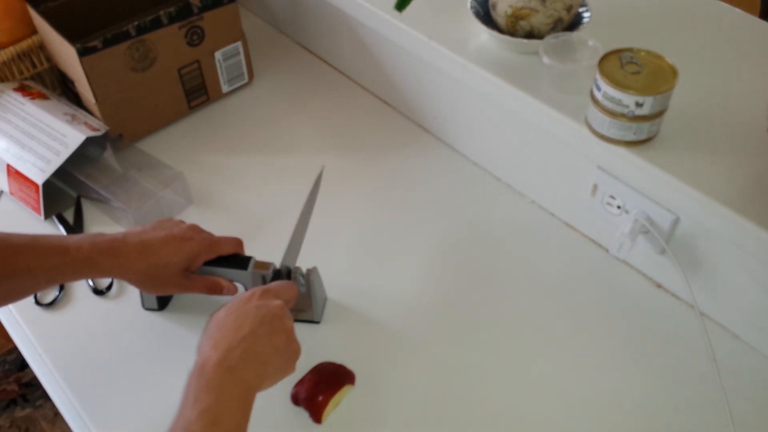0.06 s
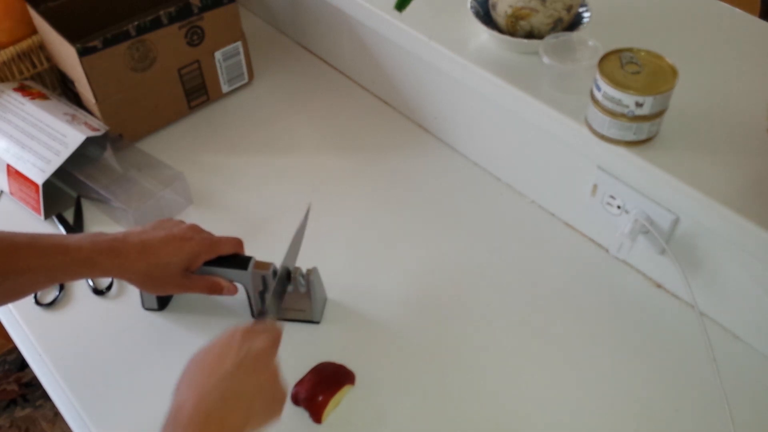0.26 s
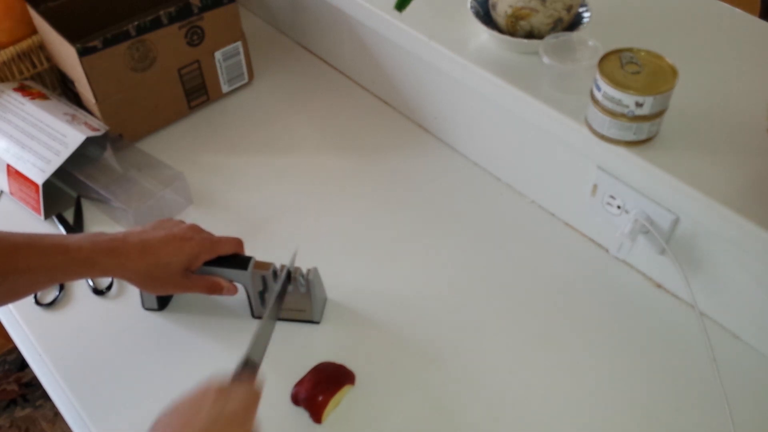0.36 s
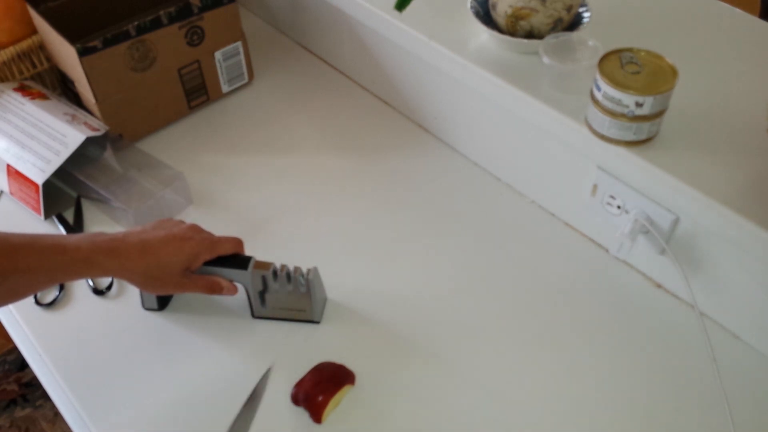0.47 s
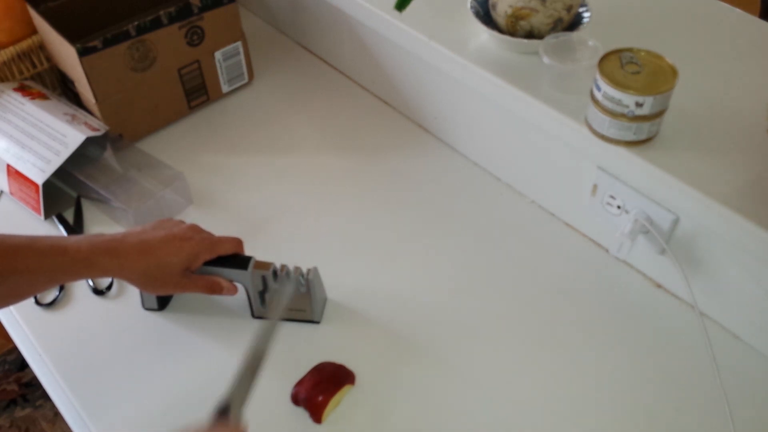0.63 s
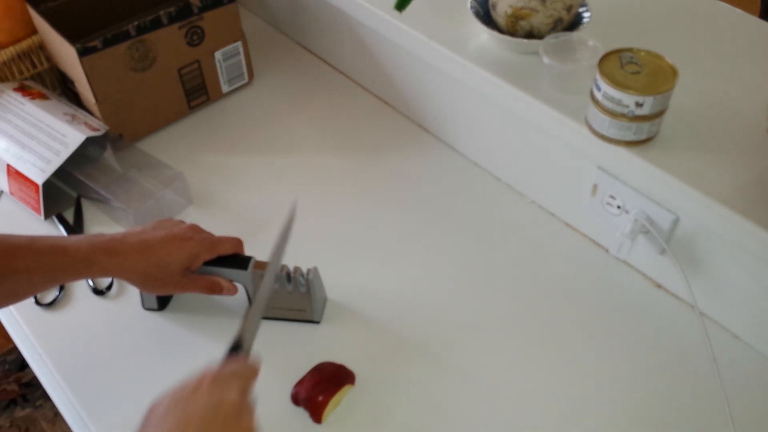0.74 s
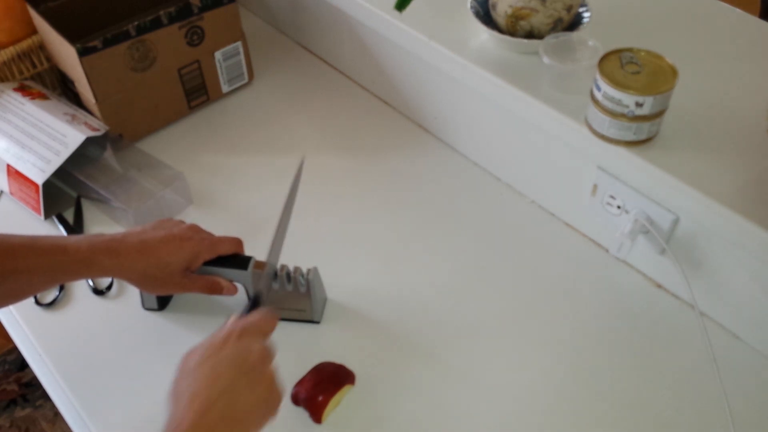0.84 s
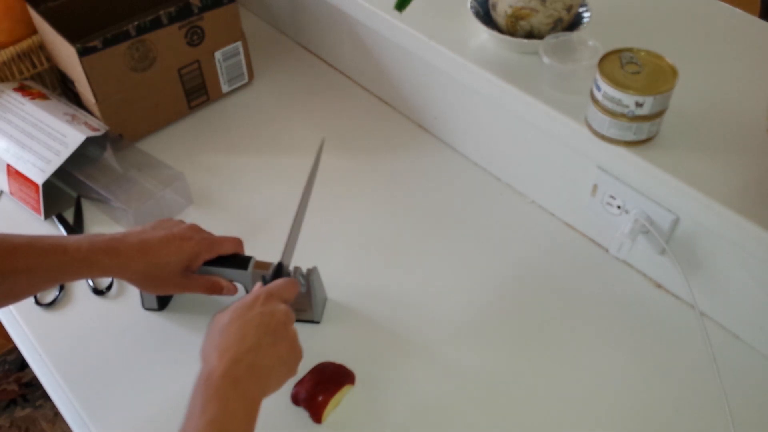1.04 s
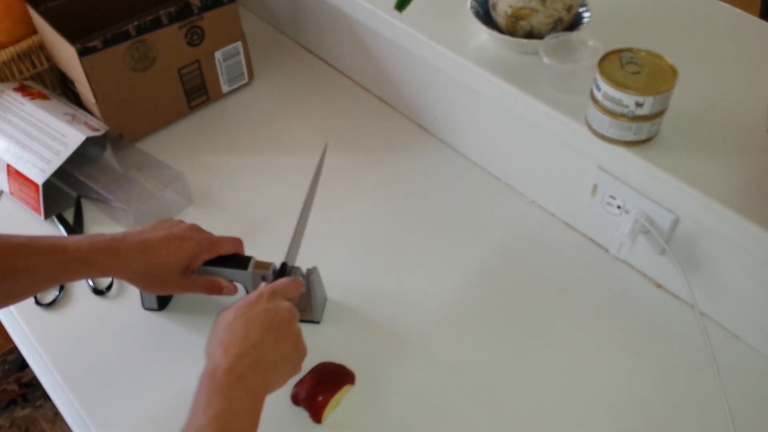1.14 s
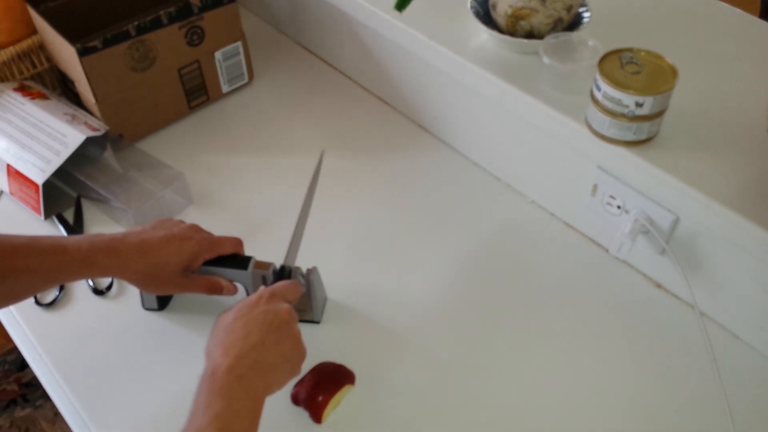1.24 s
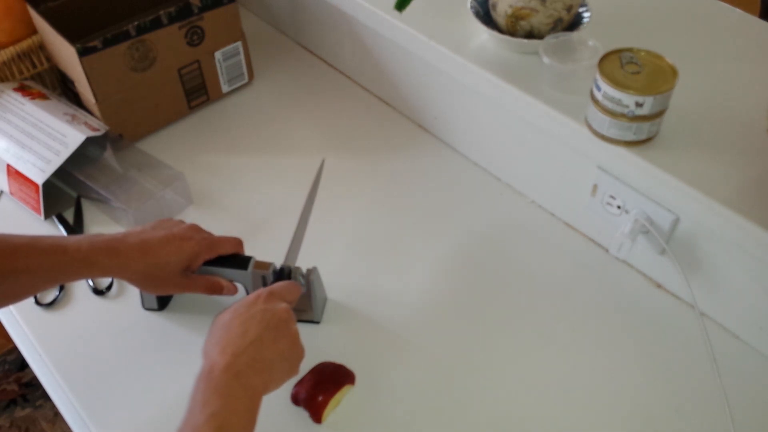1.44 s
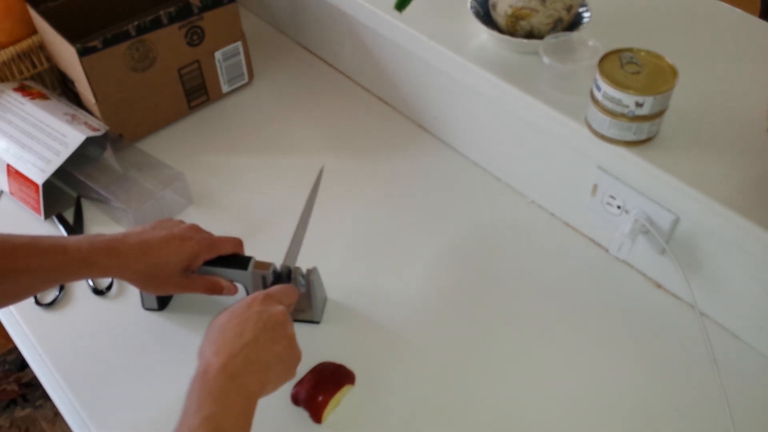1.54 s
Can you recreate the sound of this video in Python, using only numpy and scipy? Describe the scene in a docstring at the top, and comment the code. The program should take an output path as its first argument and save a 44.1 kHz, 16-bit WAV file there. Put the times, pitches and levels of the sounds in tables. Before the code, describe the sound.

One gritty scrape of a knife through a slot sharpener, followed by small clicks.

```python
"""A kitchen knife is pulled through a slot sharpener on a countertop, lifted, set back in with
small clicks and starts a second pull. The edge breaks over abrasive grit in dense tiny snaps that
ring the steel blade and the hollow slot. It squeaks on the guide and ticks against the plates,
and the plastic housing knocks on the counter.
A hard-walled kitchen echoes the knife over a bed of room tone and low appliance hum."""
import sys
import numpy as np
from scipy import signal
from scipy.fft import rfft, irfft
from scipy.io import wavfile
from scipy.ndimage import uniform_filter1d

SR = 44100
rng = np.random.default_rng(int(sys.argv[2]) if len(sys.argv) > 2 else 0)


def log_audio(samples):
    """Write samples as a 16-bit WAV file to the path given in sys.argv[1]."""
    # one column per channel
    frames = np.atleast_2d(samples).T
    # limit to full scale, then quantise
    limited = np.clip(frames, -1, 1)
    pcm = np.round(limited * 32767).astype(np.int16)
    wavfile.write(sys.argv[1], SR, pcm)


N = 70560

# friction envelopes: the edge settling in, then two pulls (t/s, level/dB, body/dB, treble/dB)
STROKES = [
    [(0, -52.5, 9, 8), (.035, -43.5, 1.5, 0), (.066, -43.5, 1, -4)],
    [(.116, -42, 13, -3), (.122, -42.5, 6, -8), (.18, -35.5, 8.5, -0.5), (.235, -24, 2.5, -3.5),
     (.275, -18, -2, -7), (.293, -17, -2, 1.5), (.308, -17.5, 0.5, -4.5), (.338, -17, -4.5, -9),
     (.38, -17.5, 1, -5.5), (.412, -20.5, -6.5, -5), (.428, -14.5, -7, -5.5), (.444, -21.5, -1, 9.5),
     (.455, -9, -7.5, -7.5), (.478, -20, 2.5, 8), (.492, -37, -3, 4), (.508, -21, 4.5, -4),
     (.518, -45, 16, 2)],
    [(1.48, -55, 2, 0), (1.495, -49, 9.5, -4), (1.54, -42, 10.5, -5), (1.578, -32, 4.5, -8),
     (1.6, -41, 19, 5)],
]
# tone curve of steel rasping on grit (f/Hz, relative level/dB)
RASP_EQ = [(100, -30.5), (250, -24), (450, -21.5), (760, -14.5), (1100, -4.5), (1500, -7), (2200, -6.5),
           (3100, -5), (3650, 1.5), (4000, -2), (4700, 3), (5500, 0), (6700, 3.5), (7150, 2), (7450, -3),
           (7900, 1), (8500, -10), (10000, -8), (12000, -13.5), (14500, -22.5)]
# hollow resonances of the plastic slot (f/Hz, relative level/dB, t60/s)
SLOT_MODES = [(594, -2.5, 0.097), (1060, 7, 0.035), (1329, -10, 0.084), (1798, 8, 0.058), (2570, -6, 0.022),
              (3310, 30, 0.003), (3620, 30, 0.0028), (4580, 23.5, 0.0077)]
# ring of the steel blade (f/Hz, relative level/dB, t60/s)
BLADE_MODES = [(1230, -12, .15), (2547, -6, .35), (3073, -6, .3), (3464, -3, .8), (4404, -4, .3),
               (4534, -5, .35), (4851, -6, .3), (5964, 0, .35), (6228, -1, .35), (6464, -2, .3),
               (6778, -1, .3), (6928, 0, .4), (7870, -8, .4)]
# decay of the kitchen reverb (f/Hz, t60/s)
KITCHEN_DECAY = [(150, 0.51), (1000, 0.44), (3000, 0.42), (6500, 0.41), (10000, 0.3), (14000, 0.11)]
# stereo placement of the knife and its echo (f/Hz, left minus right/dB)
KNIFE_PAN = [(200, -1), (700, -5.5), (1400, 3), (3000, -0.5), (4000, 1.5), (5300, 4.5), (6300, 9.5),
             (7100, 1), (7800, 8.5), (8800, -15.5), (10500, -1.5), (14000, -13)]
# tone curve of the kitchen air (f/Hz, relative level/dB)
ROOM_TONE_EQ = [(25, -2), (42, -57), (60, 3.5), (110, 3), (170, -3), (280, -2.5), (400, -8), (600, -12.5),
                (1000, -14.5), (1800, -21.5), (2700, -19.5), (4000, -26.5), (5500, -25), (6800, -21),
                (9000, -30), (14000, -40.5)]
# partials of the appliance hum (f/Hz, level/dB)
HUM_PARTIALS = [(61.5, -62.5), (235, -64), (281, -51)]
# the edge striking the slot (t/s, level/dB, body/dB, treble/dB, plate ring relative to level/dB)
EDGE_HITS = [(0.054, -41, 6.5, 1, -24), (.134, -36.5, -5, -10, -23), (0.3932, -22, 0, 4, -25),
             (0.4625, -21.5, -10.5, 0, -17), (0.4648, -20, -12, -13, -25), (.489, -17, 3, 3.5, -32),
             (1.1871, -37.5, 5, -1, -34), (1.191, -43.5, 10.5, 2, -30), (1.3395, -36, 4.5, 5, -18),
             (1.348, -42, 9, 9, -18), (1.351, -27.5, -2, -2, -13), (1.3545, -46, 11, 3, -14),
             (1.453, -59, 1, 13, -12), (1.5174, -46.5, 1, 14, -7)]
# small hard sharpening plates (f/Hz, relative level/dB, t60/s)
PLATE_MODES = [(8800, 2, .04), (11100, -15, .06), (11800, -4, 0.11), (13400, -10, 0.18), (14350, -6, 0.14)]
# the housing knocking on the counter (t/s, level/dB)
COUNTER_KNOCKS = [(0.059, -37), (0.491, -30.5), (0.528, -42), (1.191, -42.5), (1.354, -34)]
# low resonances of the plastic housing (f/Hz, relative level/dB, t60/s)
HOUSING_MODES = [(108, -9.5, 0.18), (146, 7.5, 0.028), (236, -9, 0.86), (289.3, -3.5, 0.18)]

TIME = np.arange(N) / SR
FREQS = np.arange(N // 2 + 1) * SR / N


def undb(db):
    """Decibels to gain."""
    return 10 ** (np.asarray(db) / 20)


def unit(x):
    """Scale to rms 1."""
    return x / np.sqrt(np.mean(x ** 2))


def curve(points):
    """Read (f/Hz, value) points at every frequency of the spectrum."""
    hz, value = np.array(points, float).T
    return np.interp(np.log(FREQS + 1), np.log(hz), value)


def convolve(x, response):
    """Pass a sound through an impulse response."""
    return signal.fftconvolve(x, response)[:N]


def eq(x, gain):
    """Minimum-phase EQ with the given gain at every frequency."""
    cepstrum = irfft(np.log(gain + 1e-6), N)
    causal = np.r_[cepstrum[0], 2 * cepstrum[1:N // 2]]
    response = irfft(np.exp(rfft(causal, N)), N)
    return convolve(x, response[:N // 16])


def shelves(x, body_db, treble_db, body_hz=4360, treble_hz=8100):
    """Boost or cut the body (low shelf) and the treble (high shelf) of a contact."""
    body = irfft(rfft(x) / (1 + (FREQS / body_hz) ** 4), N)
    treble = irfft(rfft(x) * (1 - 1 / (1 + (FREQS / treble_hz) ** 10)), N)
    return x + (undb(body_db) - 1) * body + (undb(treble_db) - 1) * treble


def wander(per_s):
    """Smooth random modulation with a spread near 1."""
    return 1.08 * np.interp(TIME * per_s, np.arange(N // 16), rng.standard_normal(N // 16))


def swell(peak_s, width_s):
    """Bell-shaped fade in and out."""
    return np.exp(-.5 * ((TIME - peak_s) / width_s) ** 2)


def ring(modes):
    """Decaying sines of a struck object."""
    return sum(undb(db) * np.sin(2 * np.pi * hz * TIME) * 1000 ** (-TIME / t60) for hz, db, t60 in modes)


def resonate(force, modes):
    """Drive a resonator of unit energy with a force."""
    response = ring(modes)
    return convolve(force, response / np.sqrt(np.sum(response ** 2)))


def grit(snaps_per_s=5400, spread_db=4, chatter_db=1.5):
    """The edge breaks over grit in snaps of very unequal size, bunched as it sticks and slips."""
    snaps = (rng.random(N) < snaps_per_s / SR) * rng.choice([-1, 1], N)
    sizes = undb(spread_db * np.minimum(rng.exponential(size=N), 4.5))
    snaps = unit(snaps * sizes * undb(chatter_db * wander(per_s=260)))
    snaps /= np.sqrt(uniform_filter1d(snaps ** 2, size=900) + 1e-6)  # level out over 20 ms
    force = 0
    for stroke in STROKES:
        times, db, body, treble = np.array(stroke).T
        envelope = undb(np.interp(TIME, times, db)) * (TIME > times[0]) * (TIME < times[-1])
        force += envelope * shelves(snaps, np.interp(TIME, times, body), np.interp(TIME, times, treble))
    return force


def knife(force, blade_db, slot_db=-9.5):
    """Contact forces rasp on the grit, resound in the slot and set the blade ringing."""
    rasp = eq(force, unit(undb(curve(RASP_EQ))))
    slot = undb(slot_db) * resonate(force, SLOT_MODES)
    blade = undb(blade_db) * resonate(force, BLADE_MODES)
    return rasp + slot + blade


def reverb_tail(build_s=.0028):
    """Diffuse echo off hard walls: it builds fast and the highs die first."""
    edges = np.geomspace(100, 16000, 12)
    hz, t60 = np.array(KITCHEN_DECAY).T
    tail = 0
    for lo, hi in zip(edges[:-1], edges[1:]):
        bandpass = signal.butter(3, [lo, hi], "band", fs=SR, output="sos")
        band = signal.sosfilt(bandpass, rng.standard_normal(N))
        tail += band * 1000 ** (-TIME / np.interp(np.sqrt(lo * hi), hz, t60))
    return unit(tail * (1 - np.exp(-TIME / build_s)))


def kitchen(x, early_db=5, early_s=.005, tail_db=-.5, left_lag_s=.00009):
    """Direct sound, quick reflections from counter and wall, and a diffuse tail, in stereo."""
    channels = []
    for side, lag_s in ((1, left_lag_s), (-1, 0)):
        early = unit(rng.standard_normal(N) * np.exp(-TIME / early_s))
        response = (undb(early_db) * early + undb(tail_db) * reverb_tail()) / np.sqrt(N)
        response[round(lag_s * SR)] += 1  # direct sound
        broad_colour = np.sqrt(uniform_filter1d(abs(rfft(response)) ** 2, size=180))
        response = eq(response, 1 / broad_colour)  # a neutral room that keeps its fine ripple
        channels.append(eq(convolve(x, response), undb(side * curve(KNIFE_PAN) / 2)))
    return np.array(channels)


def room_tone(level_db=-42.5, bass_width=.13, widen_hz=790):
    """A steady bed of air, narrow in the bass and wide in the treble."""
    gain = unit(undb(curve(ROOM_TONE_EQ)))
    width = np.clip(bass_width + FREQS ** 2 / (FREQS ** 2 + widen_hz ** 2), 0, 1)
    mid, side = (irfft(rfft(rng.standard_normal(N)) * g, N) for g in (gain, gain * width))
    return undb(level_db) * np.array([mid + side, mid - side])


def appliance_hum(waver_db=3.5, drift_hz=2):
    """An appliance drones on low partials, each wavering in level and pitch."""
    hum = 0
    for hz, db in HUM_PARTIALS:
        gain = undb(db + waver_db * wander(per_s=9.6))
        phase = 2 * np.pi * np.cumsum(hz + drift_hz * wander(per_s=10.2)) / SR
        hum += gain * unit(np.sin(phase))
    return hum


def squeak(pitch_hz=1680, width_hz=223, level_db=-37):
    """A short rough rub of steel on the plastic guide, gathered around one pitch."""
    phase = 2 * np.pi * np.cumsum(pitch_hz + width_hz / 2 * wander(per_s=503)) / SR
    rub = unit(np.sin(phase) * wander(per_s=550))
    return undb(level_db) * rub * swell(peak_s=.039, width_s=.011)


def ticks(decay_s=.0041):
    """The edge hits the slot: returns the sharp contact force and the thin ring of the struck plates."""
    energy = .01 * SR  # as much as 10 ms at rms 1
    force, impulses = np.zeros(N), np.zeros(N)
    for start, db, body, treble, ring_db in EDGE_HITS:
        burst = rng.standard_normal(N) * np.exp(-abs(TIME - start) / decay_s) * (TIME >= start)
        burst *= np.sqrt(energy / np.sum(burst ** 2))
        force += undb(db) * shelves(burst, body, treble)
        impulses[int(start * SR)] += undb(db + ring_db) * np.sqrt(energy)
    return force, resonate(impulses, PLATE_MODES)


def housing(rumble_db=-48, low_cut_hz=62):
    """The housing thumps as the blade loads and releases it, and rumbles through the first pull."""
    thump = ring(HOUSING_MODES)
    knocks = sum(undb(db) * np.interp(TIME - start, TIME, thump, left=0) for start, db in COUNTER_KNOCKS)
    hand_pressure = swell(peak_s=.28, width_s=.1)
    rumble = undb(rumble_db) * hand_pressure * resonate(rng.standard_normal(N), HOUSING_MODES)
    return signal.sosfilt(signal.butter(4, low_cut_hz, "high", fs=SR, output="sos"), knocks + rumble)


def scene():
    """Mix the knife layers through the kitchen reverb, over dry housing, room tone and hum."""
    taps, plate_ring = ticks()
    lean_left = undb([[.75], [-.75]])
    bed = lean_left * (housing() + room_tone() + appliance_hum())
    scrape = knife(grit(), blade_db=-17.5)
    clicks = knife(taps, blade_db=-41)
    return kitchen(scrape + squeak() + clicks + plate_ring) + bed


def record(dry, low_cut_hz=28, high_cut_hz=14550):
    """Master filters: roll off the sub bass and cut the top steeply."""
    x = signal.sosfilt(signal.butter(4, low_cut_hz, "high", fs=SR, output="sos"), dry)
    return signal.sosfilt(signal.ellip(10, .2, 80, high_cut_hz, fs=SR, output="sos"), x)


dry = scene()
out = record(dry)
log_audio(out)
```